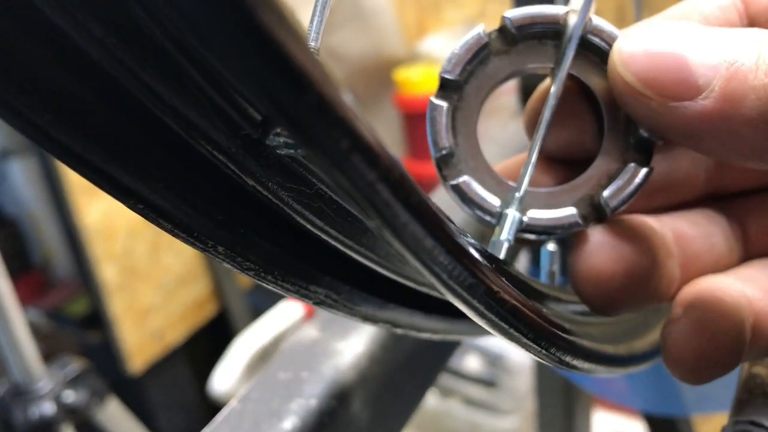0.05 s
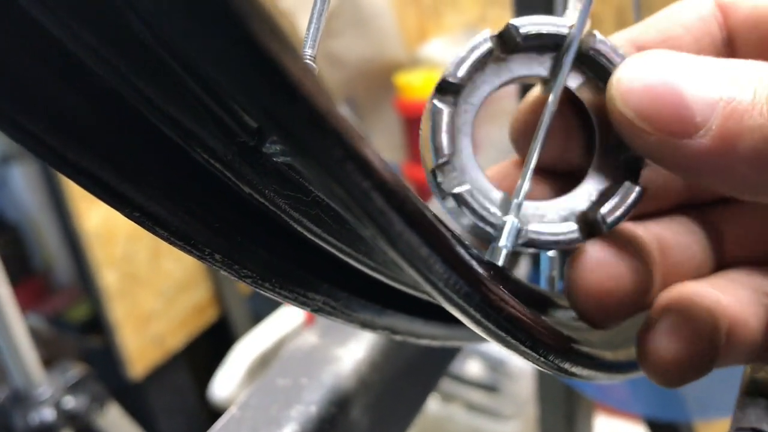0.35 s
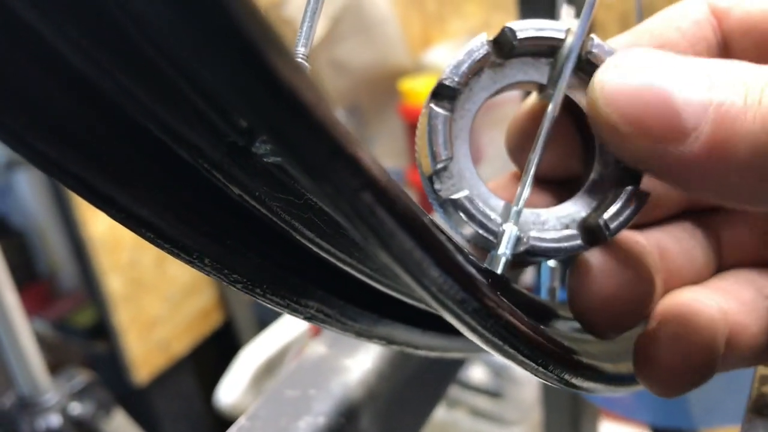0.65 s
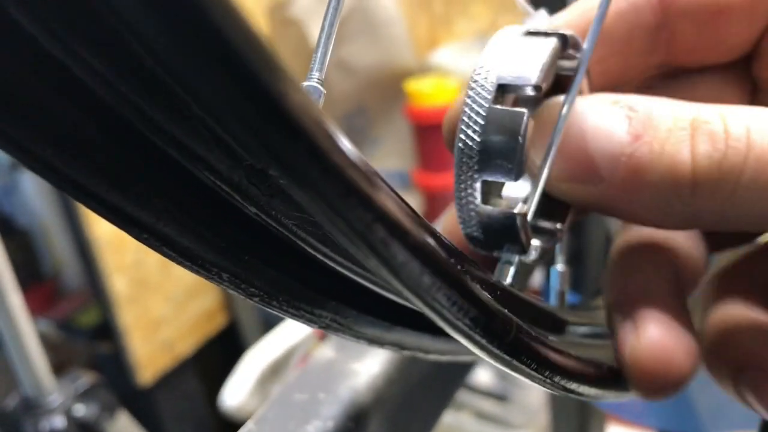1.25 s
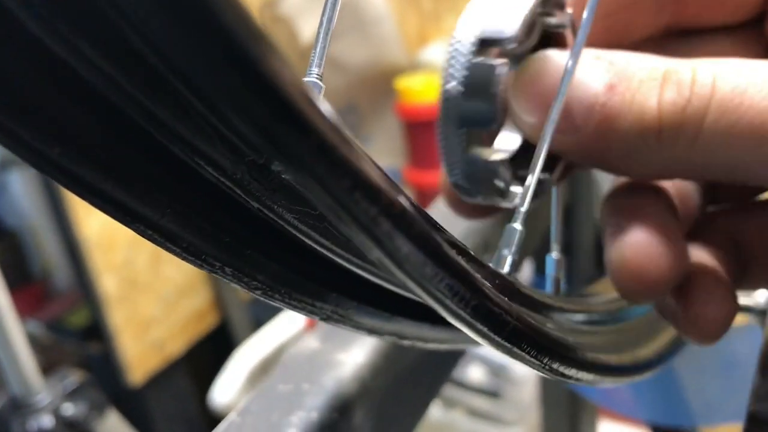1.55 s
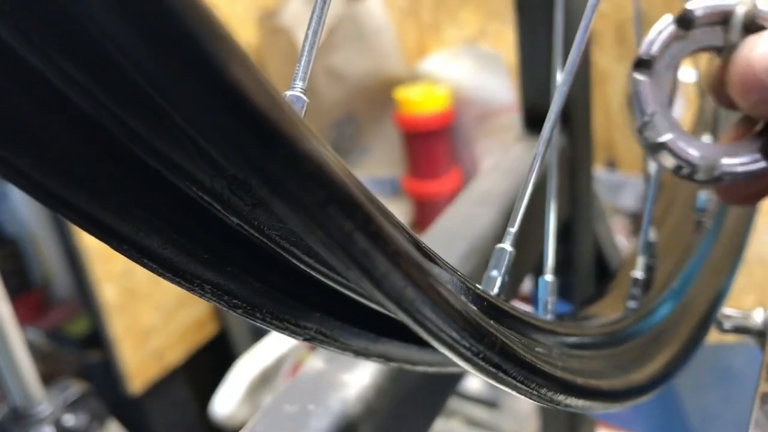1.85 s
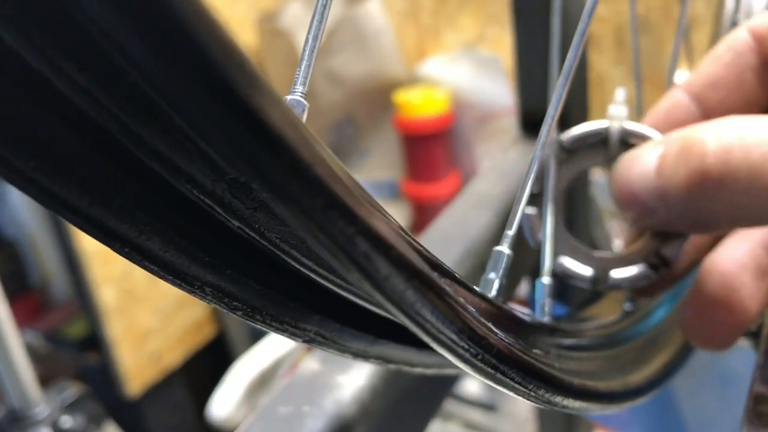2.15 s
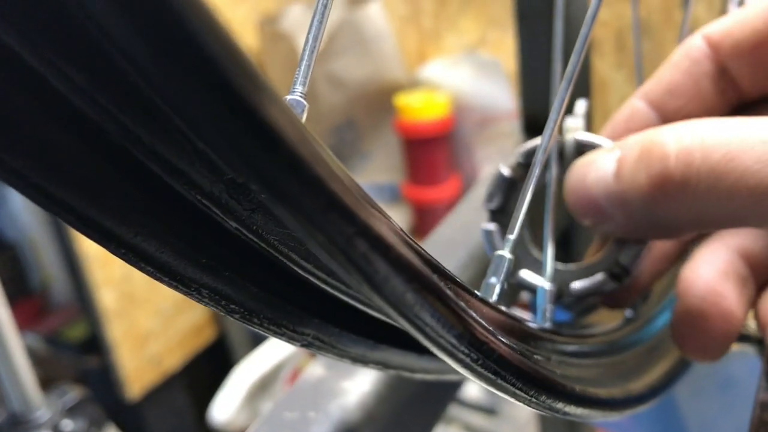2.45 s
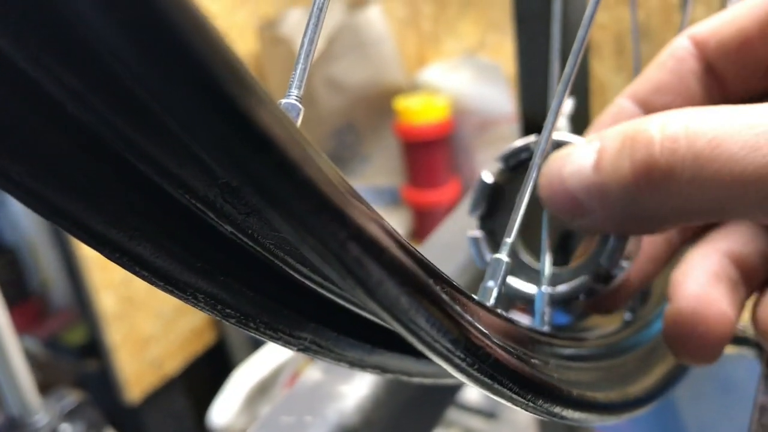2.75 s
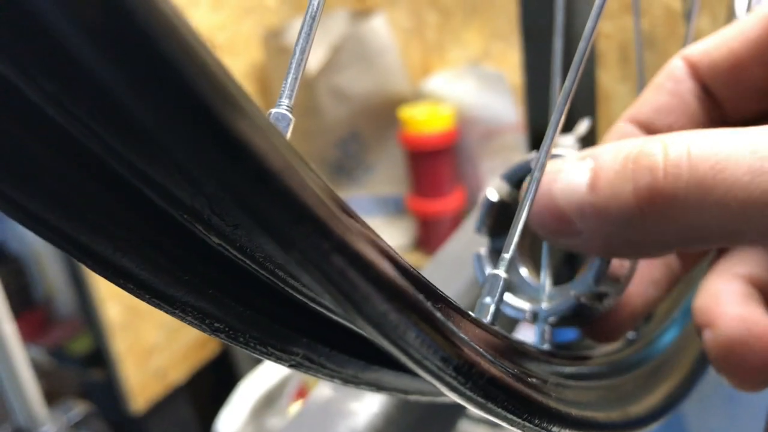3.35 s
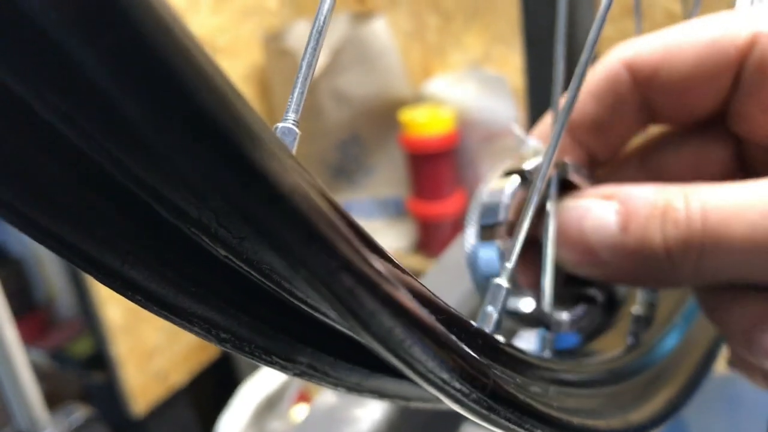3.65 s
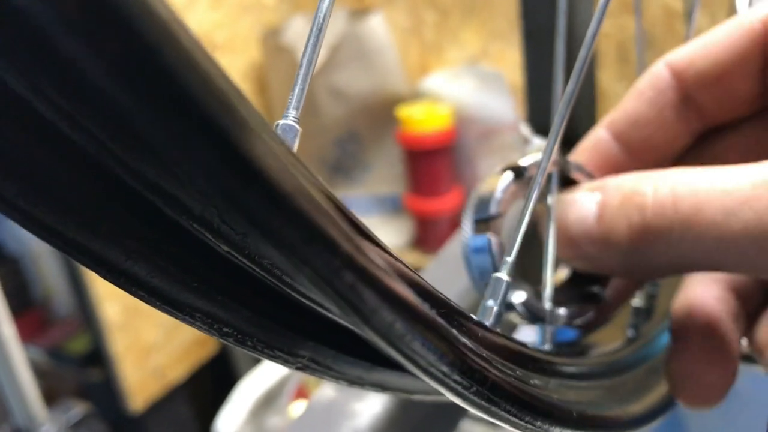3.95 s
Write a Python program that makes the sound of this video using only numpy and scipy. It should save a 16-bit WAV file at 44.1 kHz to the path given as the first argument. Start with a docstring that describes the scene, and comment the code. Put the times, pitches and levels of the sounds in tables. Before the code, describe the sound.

A steel spoke wrench clinks against bicycle spokes up close, each hit ringing briefly. Light touches lead to clinks at 0.4 and 0.9 seconds, with a faint knock at 0.7. Flurries follow around 1.2 to 1.5 and 2.3 to 2.7, spokes singing softly as they slip free. After sparser contacts, a heavier dull knock lands at 3.7, then a last clink. Low workshop rumble and hum continue underneath.

```python
"""In a small workshop, over low rumble and mains hum, a ring-shaped steel spoke wrench is worked off one
nipple of a bicycle wheel and onto the next. Light touches lead into the first clinks: each cracks and sets
rim and wrench ringing, held up by the room, while the taut spokes sing on. A dull knock comes at 0.7 s.
Flurries of clinks follow, and a spoke slips free near 1.6 s and again at 2.3 s. After sparser contacts
a heavier knock lands at 3.7 s, just ahead of the last clink and one more slipping spoke."""
import sys
import numpy as np
from scipy import signal
from scipy.fft import rfft, irfft
from scipy.io import wavfile

SR = 44100
rng = np.random.default_rng(int(sys.argv[2]) if len(sys.argv) > 2 else 0)


def wrap_up_sound(samples):
    """Save the sound to the file named by the first command line argument, as 16-bit audio."""
    columns = np.atleast_2d(samples).T
    # keep every value between -1 and 1, then stretch to whole-number steps
    tamed = np.clip(columns, -1, 1)
    steps = np.round(tamed * 32767).astype(np.int16)
    wavfile.write(sys.argv[1], SR, steps)


N = 176400
RING_SIZE = 32768
AGE = np.arange(RING_SIZE) / SR
FREQS = np.maximum(np.fft.rfftfreq(RING_SIZE, 1 / SR), 1)

# Hard clinks: t/s, level/dB, bass/dB, treble/dB, top/dB, spoke ring/dB, tail length/x,
# bell boost (f/Hz, gain/dB), favoured partials [(f/Hz, level/dB)]
CLINK_CUES = [(0.3642, -38, -1.5, -9, -9, -2.5, 1.16, (2700, 4.8), [(2450, -4.5), (3127, -1.5), (1934, -8),
              (1512, -6)]), (0.414, -42.5, 1.5, -8.5, -14, -6, 0.78, (3300, 4), [(3160, -1), (1508, -8),
              (3800, -1)]), (0.7412, -50.5, 4.5, -12, -14, -0.5, 0.77, (1200, 1.6), [(995, -0.5),
              (1504, -2.5), (786, -5.5)]), (0.8902, -35, -6.5, 0.5, 6.5, -1, 1, (3850, 4), [(1722, -7.5),
              (2874, -11), (4573, -19)]), (0.898, -38.5, -7.5, 6.5, -22, -2, 0.45, (3400, 2.4), [(3794, 2),
              (4269, -5)]), (1.2108, -44, -1, -8.5, -8.5, 5, 1.3, (2400, 2.7), [(2470, 0), (3290, -5.5),
              (1810, -7)]), (1.3657, -46.5, -5, -31, -19, 1, 0.48, (3050, 8.2), [(2651, -2)]),
              (1.4898, -36.5, -2.5, 0.5, -2, 3, 1.035, (3300, 7.6), [(2860, -5), (2625, -7), (3046, -1.5)]),
              (1.5050, -39.5, -9.5, -22, -14, 9, 0.9, (2200, 3.5), [(5180, -9), (7979, -10), (4180, -3)]),
              (2.2647, -43, -8.5, 2, 14, 7, 0.75, (3800, 12.8), [(3933, 3.5), (3515, 4.5), (1157, -0.5)]),
              (2.277, -39, -8.5, 2, 4, 4.5, 1.22, (3770, 5.4), [(1660, -9.5), (2034, -5), (5190, -8.5)]),
              (2.5135, -37.5, -6, -11.5, 1.5, 6.5, 1.22, (4200, 8.6), [(2881, -6.5), (3589, -7), (3927, -8),
              (5190, -12.5)]), (2.639, -48, 2.5, -8, -12, 0, 1.04, (1850, 2.7), [(1939, 4.5)]),
              (2.7058, -42.5, -4, -4, -5, 0.5, 1.08, (4900, 4.7), [(1990, -5), (4540, -9)]),
              (3.0618, -48, -1, -1, 7.5, -1, 0.71, (5200, 9), [(4574, 7), (1264, -5)]),
              (3.1012, -42, 4, -11.5, -11, 2.5, 0.86, (1530, 3.3), [(2760, -6), (3070, -4), (985, -5)]),
              (3.827, -36, 4, -8.5, -3.5, 0, 0.72, (3200, 2.2), [(966, -1.5), (1714, -6), (2429, -8)])]
# Light touches and slides: t/s, level/dB, treble/dB
TOUCH_CUES = [(0.1436, -53.5, -12.5), (0.1689, -57.5, -2.5), (0.392, -42.5, -13), (0.5570, -61.5, -13),
              (1.263, -50.5, -13.5), (1.4451, -60.5, 2.5), (1.46, -51, -11), (1.4719, -46.5, -6),
              (2.528, -39, -0.5), (2.6040, -46, -8), (3.5702, -52, 1.5), (3.6342, -58, 0.5),
              (3.932, -54.5, -1)]
def contacts():
    """Wrench on nipple: every hit excites the same rim, spoke and wrench modes in a different balance."""
    out = np.zeros(N)
    rim_peaks = ripple(spread_db=5.2, count=1200)
    tones = ringing(SPOKE_MODES + WRENCH_MODES)

    def strike(eq, spoke_db, length):
        """Layer one hit: dense ring, crack and clear tones."""
        spectrum = contact_spectrum(eq)
        body = dense_ring(spectrum * rim_peaks, length) + crack(spectrum)
        sound = clear_tones(tones, eq, spoke_db)
        sound[:RING_SIZE] += attack(AGE, rise_s=.0003) * body
        return sound

    for s, db, bass_db, treble_db, top_db, spoke_db, length, bell, partials in CLINK_CUES:
        eq = (bass_db, treble_db, top_db, bell)
        add(out, s, from_db(db) * (strike(eq, spoke_db, length) + ping(partials, length)))
    for s, db, treble_db in TOUCH_CUES:
        bass_db, top_db = -4.5, treble_db - 7.5
        add(out, s, from_db(db) * strike((bass_db, treble_db, top_db), spoke_db=5.5, length=1))
    return out


# EQ points for bass, both ends of the flat mids, treble and top: f/Hz
EQ_POINTS = (1000, 2700, 3700, 6200, 13000)
def contact_eq(hz, bass_db, treble_db, top_db, bell=None):
    """Tone of one hit: its own bass, treble and top, with one group of modes lifted if a bell is given."""
    db = at_hz(list(zip(EQ_POINTS, (bass_db, 0, 0, treble_db, top_db))), hz)
    if bell:
        centre_hz, boost_db = bell
        octaves_off = np.log2(hz / centre_hz)
        db = db + boost_db * np.exp(-.5 * (octaves_off / 0.16) ** 2)
    return from_db(db)


# Tone curve of rim and wrench: f/Hz, level/dB
METAL_SPECTRUM = [(150, -11), (330, -3.5), (480, -22.5), (660, -14), (790, -3.5), (1150, 5.5), (1320, -1),
                  (1700, 3.5), (2600, -0.5), (3800, -1), (4400, -1.5), (5500, -6), (6600, -2), (8800, -2),
                  (10300, -7), (12600, -7), (16000, -14)]
def contact_spectrum(eq):
    """What one hit excites: the metal's tone curve through the hit's EQ, with a ripple of its own."""
    shape = from_db(at_hz(METAL_SPECTRUM, FREQS))
    shape *= np.sqrt(RING_SIZE / np.mean(shape ** 2))
    return shape * contact_eq(FREQS, *eq) * ripple(spread_db=2.3, count=160)


# Tail of the dense ring by band: f/Hz, t60/s
METAL_DECAY = [(300, 1), (1000, 0.34), (2000, 0.35), (4000, 0.25), (8000, 0.15), (16000, 0.11)]
def dense_ring(spectrum, length):
    """The packed modes of rim and wrench die away by band; the fingers' grip sets the tail length."""
    hold_s = 0.0098  # early reflections hold the level up
    centres, t60s = np.transpose(METAL_DECAY)
    bands = np.array([np.interp(np.log(FREQS), np.log(centres), row) for row in np.eye(len(centres))])
    tails = fade(np.maximum(AGE - hold_s, 0), length * t60s[:, None])
    return (irfft(bands * spectrum * random_phases()) * tails).sum(axis=0)


def crack(spectrum):
    """The transient: one impact, then three ever weaker rebounds at uneven gaps."""
    rebound_s, loss_db, decay_s = .008, 3.5, .001
    burst = from_db(7) * irfft(spectrum * random_phases())
    gaps = rebound_s * (.5 + rng.random(3))
    chatter = sum(from_db(-loss_db * k) * (AGE >= s) * np.exp(-np.abs(AGE - s) / decay_s)
                  for k, s in enumerate(np.append(0, np.cumsum(gaps))))
    low_cut = signal.butter(2, 1030, "high", fs=SR, output="sos")  # the crack keeps out of the bass
    return signal.sosfilt(low_cut, burst * chatter)


def ping(partials, length):
    """The partials a contact point favours stand out and die with the rim."""
    return ringing([(hz, db, length * at_hz(METAL_DECAY, hz)) for hz, db in partials]).sum(axis=0)


# Singing taut spokes: f/Hz, level/dB, t60/s
SPOKE_MODES = [(748, -30, .7), (886, -27, 1.3), (968, -23, .9), (989, -20.5, 1.35), (1519, -22, .5),
               (1793, -20, .5), (1935, -17.5, .68), (2038, -23, .55), (2304, -21, .45), (2435, -21, .35),
               (2631, -20, .35), (2877, -17, .38), (3055, -22, .38), (3090, -20, .32), (3439, -19, .3),
               (3704, -19, .32)]
# Bright, short ring of the steel wrench: f/Hz, level/dB, t60/s
WRENCH_MODES = [(4576, -18, .22), (5200, -17, .22), (6500, -18, .16), (8037, -15, .16), (8900, -15, .16),
                (11644, -17, .17), (12694, -16, .17)]
def clear_tones(tones, eq, spoke_db):
    """The pitched layer: a hit drives each spoke and wrench mode through its EQ, in random polarity."""
    mode_hz = np.array(SPOKE_MODES + WRENCH_MODES)[:, 0]
    is_spoke = np.arange(len(mode_hz)) < len(SPOKE_MODES)
    gains = from_db(spoke_db * is_spoke) * contact_eq(mode_hz, *eq)
    return (gains * rng.choice([-1, 1], len(mode_hz))) @ tones


# Spokes slipping free: t/s, f/Hz, level/dB
PLUCK_CUES = [(1.555, 888, -53.5), (2.29, 1940, -50), (3.83, 884, -54.5)]
def plucks():
    """A spoke that slips free of the wrench sings on in one of its modes."""
    out = np.zeros(N)
    t60s = [(hz, t60) for hz, _, t60 in SPOKE_MODES]
    for s, hz, db in PLUCK_CUES:
        add(out, s, ringing([(hz, db, at_hz(t60s, hz))])[0])
    return out


# Dull knocks on the wheel: t/s, level/dB
KNOCK_CUES = [(0.742, -55), (3.7151, -43)]
# Tone curve of the thud: f/Hz, level/dB
THUD_SPECTRUM = [(100, 0), (380, 5), (520, -3.5), (800, -10.5), (1400, -9), (2800, -15), (4500, -32),
                 (15000, -50)]
# Low body of the wheel: f/Hz, level/dB, t60/s
WHEEL_MODES = [(135, -16.5, 0.31), (195, -15, 0.52), (363, -2, 0.29)]
def knocks():
    """Soft bumps: a short thud, then the low modes of the wheel in its stand."""
    out, rise_s = np.zeros(N), 0.00377
    envelope = np.minimum(AGE / rise_s, 1) * fade(AGE, t60=0.19)
    for s, db in KNOCK_CUES:
        add(out, s, from_db(db) * noise(THUD_SPECTRUM, RING_SIZE) * envelope)
        add(out, s + rise_s, from_db(db) * ringing(WHEEL_MODES).sum(axis=0))
    return out


# Bass-heavy room tone: f/Hz, level/dB
ROOM_SPECTRUM = [(22, -40), (32, -9), (45, -0.5), (70, 0.5), (90, -7), (130, -14.5), (270, -17),
                 (450, -22.5), (700, -24.5), (950, -22.5), (1300, -28.5), (2500, -33.5), (5000, -39),
                 (15000, -44)]
def workshop():
    """The bed: low rumble, faint hiss and mains hum."""
    room_db, hum_db, hum_hz = -57.5, -61.5, 59.3
    hum = np.sin(2 * np.pi * hum_hz * np.arange(N) / SR)
    return from_db(room_db) * noise(ROOM_SPECTRUM, N) + from_db(hum_db) * hum


def ringing(modes):
    """One row per mode: a dying sine that beats against a weaker twin tuned slightly sharp."""
    t = np.arange(SR) / SR
    detunes = 1 + 0.006 * (.5 + rng.random(len(modes)))
    phases = 2 * np.pi * rng.random(len(modes))
    rows = []
    for (hz, db, t60), detune, phase in zip(modes, detunes, phases):
        twin = from_db(-11) * np.sin(2 * np.pi * hz * detune * t + phase)
        rows.append(from_db(db) * fade(t, t60) * (np.sin(2 * np.pi * hz * t) + twin))
    return attack(t, rise_s=.001) * np.array(rows)


def ripple(spread_db, count):
    """Random peaks and dips across the spectrum, mean power 1."""
    gain = from_db(spread_db * np.interp(FREQS, np.linspace(1, SR / 2, count), rng.standard_normal(count)))
    return gain / np.sqrt(np.mean(gain ** 2))


def random_phases():
    """Phases that smear a spectrum into noise."""
    return np.exp(2j * np.pi * rng.random(len(FREQS)))


def noise(spectrum, size):
    """Coloured noise of rms 1."""
    hz = np.maximum(np.fft.rfftfreq(size, 1 / SR), 1)
    x = irfft(rfft(rng.standard_normal(size)) * from_db(at_hz(spectrum, hz)), size)
    return x / x.std()


def attack(age, rise_s):
    """Smooth fade-in over the time of contact."""
    return np.sin(np.pi / 2 * np.minimum(age / rise_s, 1)) ** 2


def fade(age, t60):
    """Exponential tail, 60 dB down at t60."""
    return np.exp(-np.log(1000) * age / t60)


def from_db(db):
    """Decibels to gain."""
    return 10 ** (np.asarray(db) / 20)


def at_hz(points, hz):
    """Read a curve on a log-frequency axis."""
    f, value = np.transpose(points)
    return np.interp(np.log(hz), np.log(f), value)


def add(out, s, sound):
    """Mix a sound in at s seconds."""
    start = int(s * SR)
    out[start:start + len(sound)] += sound[:N - start]


def scene():
    """Wrench and wheel up close over the room tone, in mono."""
    return (contacts() + plucks() + knocks() + workshop())[None]


def record(dry):
    """Steep high cut at 16 kHz."""
    return signal.sosfilt(signal.ellip(10, .2, 70, 16000, fs=SR, output="sos"), dry)


dry = scene()
out = record(dry)
wrap_up_sound(out)
```